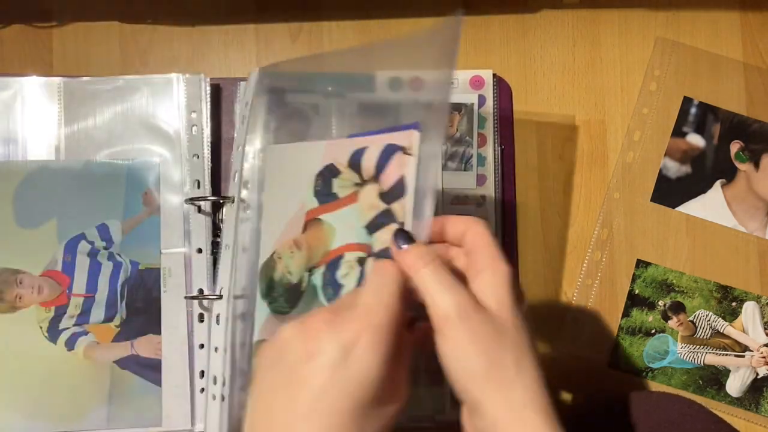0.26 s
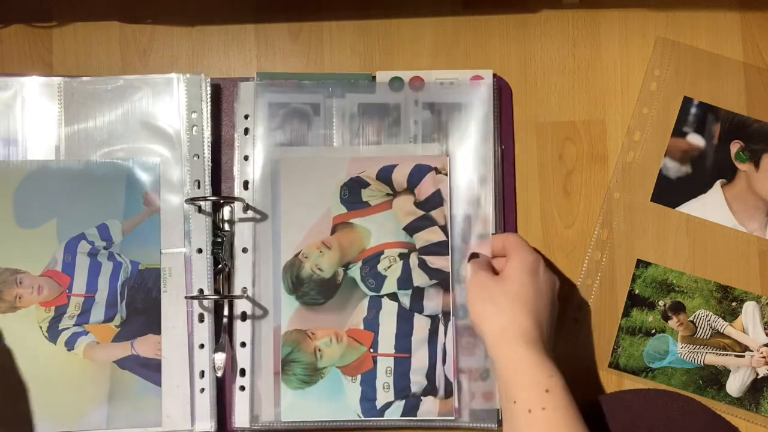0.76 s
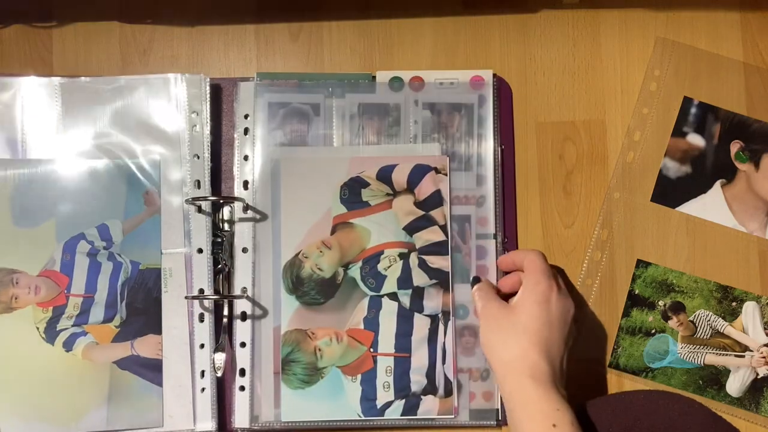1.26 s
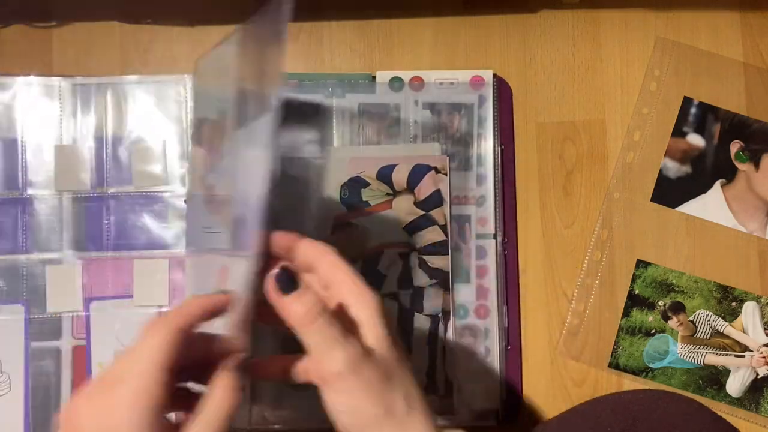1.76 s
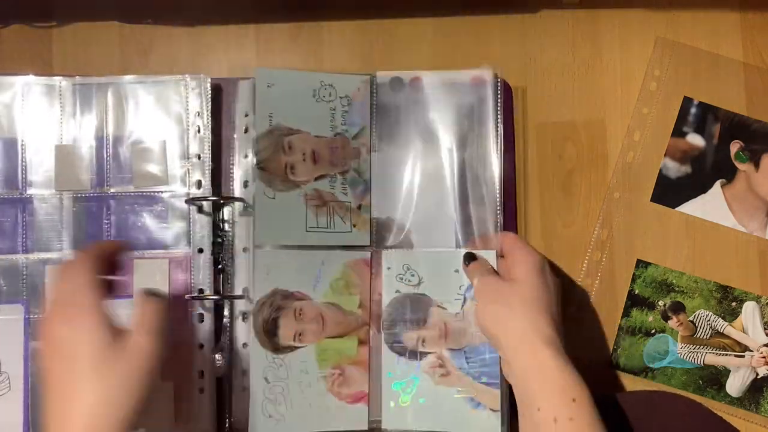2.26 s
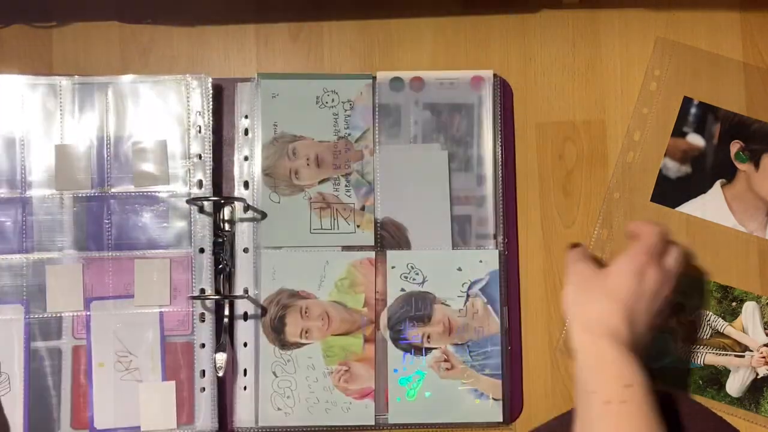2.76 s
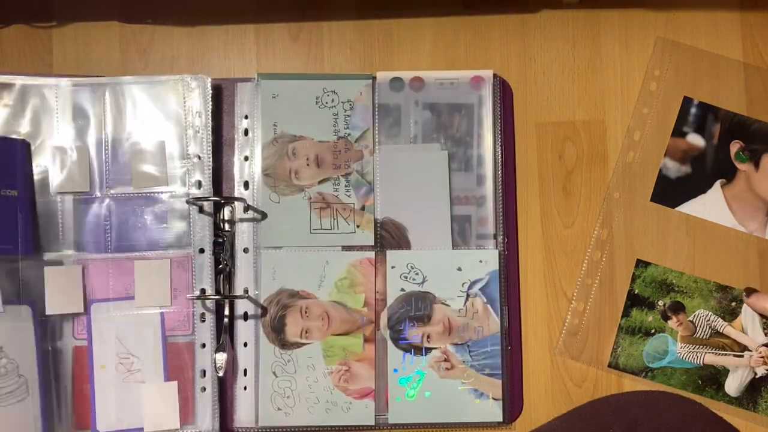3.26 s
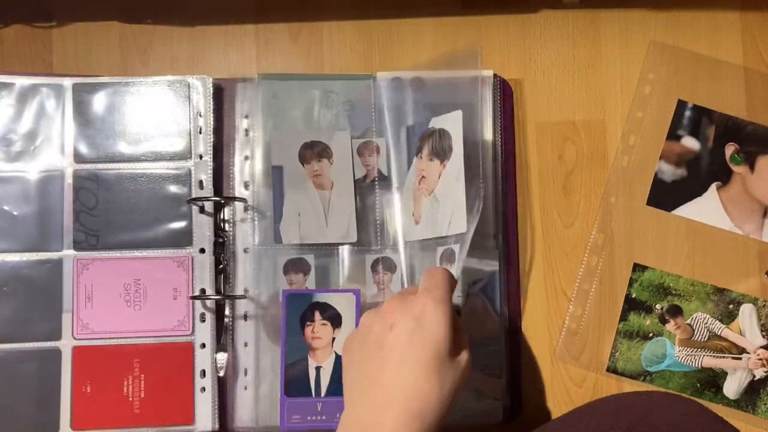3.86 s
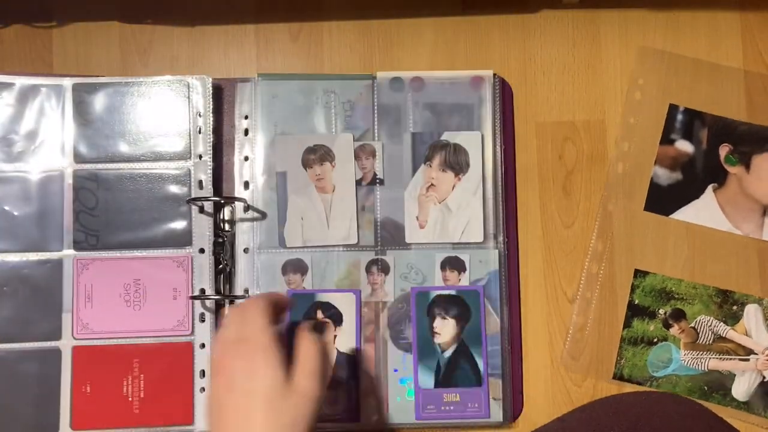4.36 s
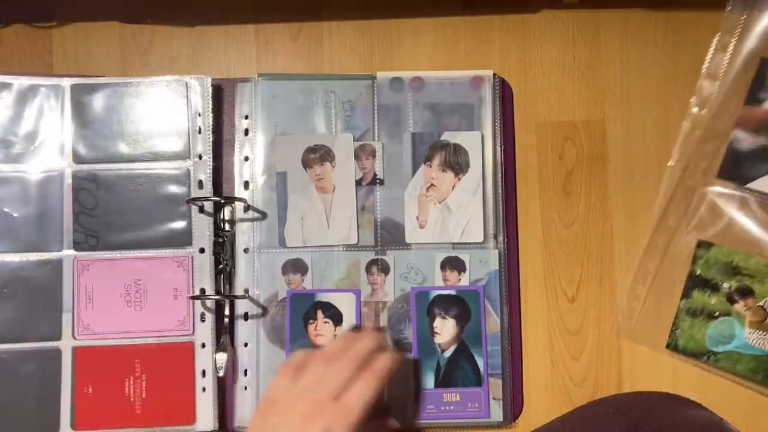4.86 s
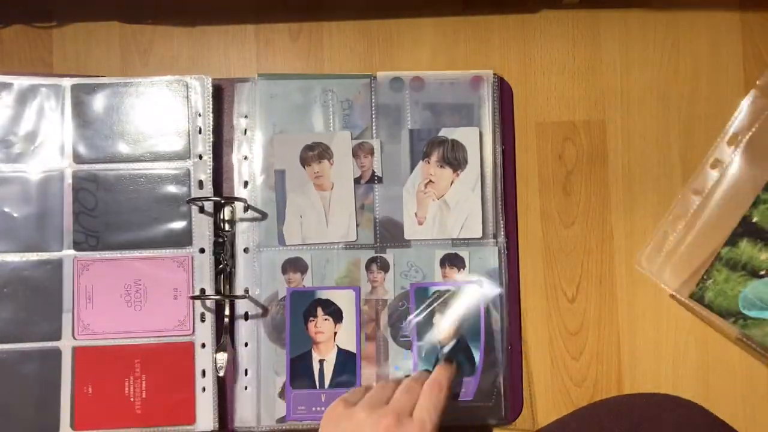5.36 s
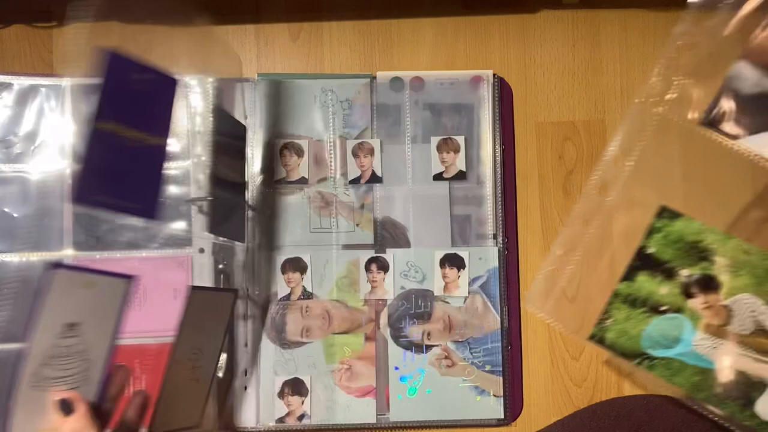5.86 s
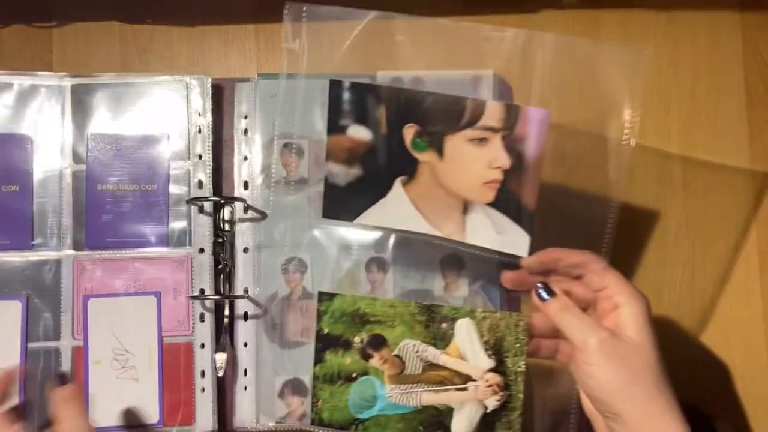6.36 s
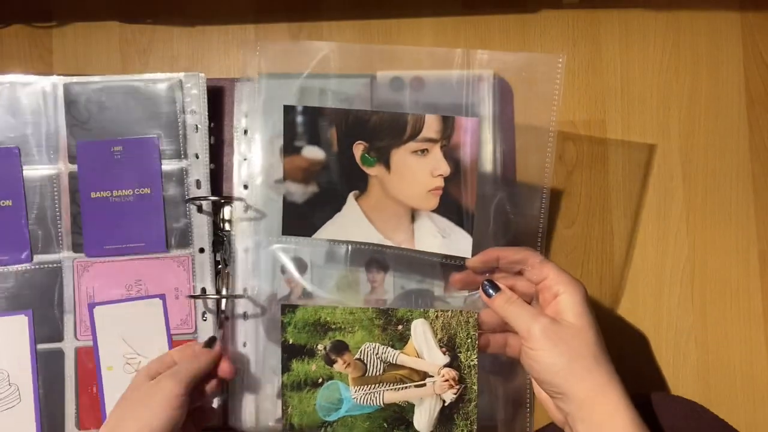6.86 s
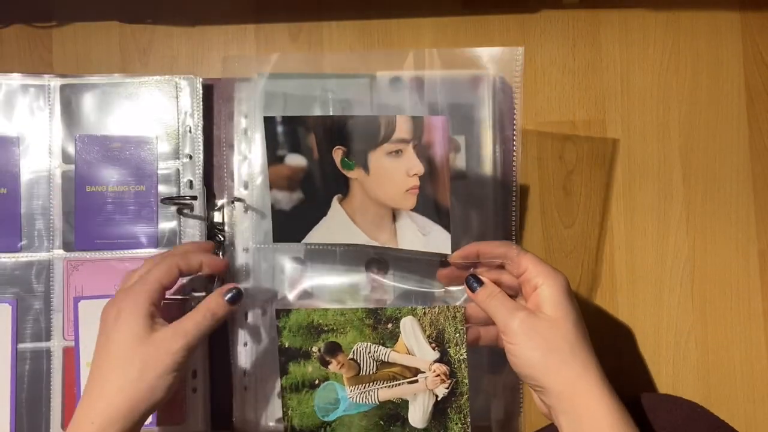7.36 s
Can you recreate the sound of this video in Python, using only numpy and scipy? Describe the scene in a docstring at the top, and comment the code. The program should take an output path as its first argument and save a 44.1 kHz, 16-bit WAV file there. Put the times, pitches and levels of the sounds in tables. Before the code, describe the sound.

Thin plastic pages crinkle, pop and swish under handling, a loose sleeve is shaken noisily, then metal binder rings snap open.

```python
"""Hands turn clear plastic sleeves in a ring binder on a desk: showers of tiny random slips excite resonant film.
Folds buckle with a crack and a falling pop, a loose sleeve is shaken flat, and pages push puffs of low noise.
Edges scrape as trains of short rings, a fingertip squeaks by stick-slip, and a stiff seam ticks.
The binder rings spring open with a clack of damped modes. A two-port microphone hears it all in a small room."""
import sys
import numpy as np
from scipy import signal
from scipy.fft import rfft, irfft
from scipy.io import wavfile
from scipy.ndimage import uniform_filter1d, map_coordinates

SR = 44100
rng = np.random.default_rng(int(sys.argv[2]) if len(sys.argv) > 2 else 0)


def wav_record(signal):
    """Record a signal, one row per channel, as 16-bit PCM in the file named by sys.argv[1]."""
    frames = np.transpose(np.atleast_2d(signal))
    bounded = np.clip(frames, -1, 1)
    # unit amplitude maps onto the largest positive 16-bit level
    quanta = np.round(bounded * 32767).astype(np.int16)
    wavfile.write(sys.argv[1], SR, quanta)


N = 336483

# broad resonances of the plastic film: f/Hz, width/Hz, gain/dB
FILM_MODES = [(3150, 1460, 9), (4460, 6700, -13.5), (5370, 2100, 7), (8710, 900, 10), (10750, 870, 10.5),
              (15600, 500, 3)]
# broad resonances of stiff creases and cards: f/Hz, width/Hz, gain/dB
CARD_MODES = [(1090, 210, 4), (1470, 660, 7), (2000, 1120, 5)]
# broad resonances of whole pages: f/Hz, width/Hz, gain/dB
PAGE_MODES = [(307, 193, -0.5), (494, 310, 1), (640, 240, 0.5)]


def undb(db):
    """Level to amplitude: 20 dB is a factor of ten."""
    return 10 ** (np.asarray(db) / 20)


def unit(x):
    """Normalisation to an rms of 1."""
    return x / np.sqrt(np.mean(x ** 2))


def resonate(x, modes):
    """Modal superposition: parallel broad resonances, neighbours in opposite phase."""
    out = 0
    for k, (hz, width, db) in enumerate(modes):
        b, a = signal.iirpeak(hz, hz / width, fs=SR)
        out = out + (-1) ** k * undb(db) * signal.lfilter(b, a, x)
    return out


def walk(rate):
    """Slow random modulation: normal values held for 1 / rate seconds, then smoothed by a moving average."""
    hold = int(SR / rate)
    steps = np.repeat(rng.standard_normal(N // hold + 1), hold)
    return uniform_filter1d(steps, hold)[:N]


def add(out, s, x):
    """Linear superposition: mix x into out from s seconds on."""
    i = int(s * SR)
    out[i:i + len(x)] += x[:len(out) - i]


def crinkle(modes, rate, spread_db, grain_s, smooth_db, patchy_db, colour_db=4.0, drift_db=1.0):
    """Shot noise: random slips (rate per second) over smooth rubbing excite each mode in varying strength."""
    at = np.flatnonzero(rng.random(N) < rate / SR)
    size_db = np.minimum(spread_db * rng.exponential(size=len(at)), 11)
    noise = undb(patchy_db * walk(25)) * rng.standard_normal(N)
    out = 0
    for k, mode in enumerate(modes):
        slips = np.zeros(N)
        slips[at] = undb(size_db + colour_db * rng.standard_normal(len(at)))
        grains = signal.lfilter([1], [1, -np.exp(-1 / (grain_s * SR))], slips)
        rubbing = undb(smooth_db + drift_db * walk(13.0))
        out = out + (-1) ** k * resonate((unit(grains) + rubbing) * noise, [mode])
    return unit(out)


def tilted(level_db, tilt_db, film_db, page_db):
    """Spectral tilt: gains of film, card and page, where a heavier bend trades film for page."""
    return undb([level_db - tilt_db + film_db, level_db, level_db + tilt_db + page_db])


def rustle():
    """Friction noise: film, cards and pages follow the hands; moving pages displace air as low-frequency noise."""
    # rubbing of the hands: t/s, level/dB, tilt towards the bass/dB
    hand_rubs = [(0.0, -62, -9), (.25, -81, 14.5), (.53, -67, -5.5), (1.04, -89, -3), (1.4, -75.5, -6.5),
                 (1.7, -63, -2.5), (2.17, -64, 1), (2.68, -81.5, -5), (3.08, -84, -5), (3.51, -54, -5),
                 (3.65, -63, 3.5), (3.91, -61, 3.5), (4.1, -92, -24), (4.4, -60, 1), (4.93, -71, -14.5),
                 (5.151, -66.5, 6.5), (5.5, -72.5, 3), (6.1, -55, -1), (6.271, -74.5, 2), (6.821, -73, 8.5),
                 (7.63, -86.5, 14)]
    # puffs of air pushed by the pages: peak t/s, level/dB
    air_puffs = [(0.01, -53), (.17, -55), (.33, -53), (.76, -56), (1.64, -52), (1.8, -60), (2.32, -58.5),
                 (3.15, -63.5), (3.48, -52), (3.618, -59), (4.049, -53), (5.08, -46), (5.254, -40),
                 (5.65, -51), (5.829, -47), (6.86, -55)]
    # resonances of the moving air: f/Hz, width/Hz, gain/dB
    air_modes = [(66, 35.5, 3.5), (123, 63, 1.5), (186, 99, -2)]
    film_db, page_db, air_db = -0.5, -1.5, -12  # against the rubbing level
    air_rest_db = -77
    rise_db_per_s, fall_db_per_s = 499.5, 305.5  # slopes of a puff
    t = np.arange(N) / SR
    s, *columns = np.transpose(hand_rubs)
    level_db, tilt_db = (np.interp(t, s, c) for c in columns)
    film = crinkle(FILM_MODES, 120., 4.2, 0.00081, -0.8, 1.7)
    card = crinkle(CARD_MODES, 51.0, 4.4, 0.0073, 0.86, 1.1)
    page = crinkle(PAGE_MODES, 58.0, 2.5, 0.015, 0.67, 6.0)
    air = undb(5.6 * walk(12)) * resonate(rng.standard_normal(N), air_modes)
    fan = undb(level_db + air_db) + undb(air_rest_db)
    for peak, db in air_puffs:
        drop_db = np.maximum(rise_db_per_s * (peak - t), fall_db_per_s * (t - peak))
        fan = fan + undb(db - drop_db)
    rub = np.sum(tilted(level_db, tilt_db, film_db, page_db) * [film, card, page], axis=0)
    return rub + fan * unit(air)


def hush():
    """Stationary random noise: room tone of fixed spectrum, coherent between the ports in the bass."""
    # corners of the room-tone spectrum: f/Hz, relative level/dB
    tone_spectrum = [(30, 30), (68, 11), (1580, -43.5), (2480, -8), (5450, -10), (7260, -49.5),
                     (9000, -0.5), (11700, -68.5), (19800, -120)]
    level_db = -78
    f = np.maximum(np.arange(N // 2 + 1) * SR / N, 1)
    hz, db = np.transpose(tone_spectrum)
    shape = undb(np.interp(np.log(f), np.log(hz), db))
    mid, side = rfft(rng.standard_normal((2, N))) * shape
    side = side * np.minimum(f / 500, 1)
    return undb(level_db) * unit(irfft(np.array([mid + side, mid - side]), N))


def crumples():
    """Shot noise under an envelope: each handful of film swells exponentially to a peak and fades again."""
    # crumpled handfuls: peak t/s, level/dB, tilt towards the bass/dB, extra for stiff creases/dB,
    # build-up/s and fade/s (each to exp(-2) of the peak amplitude)
    handfuls = [(0.102, -60.5, 0, 0.5, 0.019, 0.031), (0.1634, -52, 2.5, -7, 0.021, 0.025),
                (0.2304, -48.5, -2.5, -0.5, 0.015, 0.025), (0.289, -49.5, 2, -6.5, 0.013, 0.078),
                (0.566, -53.5, 4, -4.5, 0.016, 0.031), (0.775, -70, 27, -6, 0.013, 0.044),
                (0.927, -63, -1, -16, 0.047, 0.02), (1.072, -64.5, -9.5, 5.5, 0.041, 0.059),
                (1.347, -59.5, 1.5, 3, 0.084, 0.043), (1.454, -60.5, -1.5, 5.5, 0.014, 0.044),
                (1.611, -52, -2.5, -1, 0.08, 0.16), (1.799, -47, 4, -6.5, 0.005, 0.026),
                (1.975, -47, -3, 0, 0.054, 0.012), (2.631, -65, -6.5, 1, 0.051, 0.0087),
                (3.001, -71.5, -11.5, 2, 0.0034, 0.15), (3.154, -59, -2, 2, 0.023, 0.11),
                (3.389, -54, -4.5, 1, 0.041, 0.049), (3.9385, -53, -1.5, -2.5, 0.085, 0.16),
                (4.318, -54, -1.5, -9, 0.12, 0.056), (4.3685, -55.5, -0.5, 6, 0.026, 0.014),
                (4.461, -55.5, 0, 8.5, 0.0064, 0.015), (4.65, -50, -3, 3, 0.021, 0.015),
                (4.893, -45, -3.5, -1.5, 0.0082, 0.0087), (4.917, -46, -2.5, -2.5, 0.0078, 0.034),
                (5.079, -32, -3.5, -1, 0.02, 0.018), (5.139, -28.5, -7.5, -0.5, 0.0065, 0.012),
                (5.228, -38.5, -3, -3.5, 0.024, 0.06), (5.41, -58.5, 1, 2, 0.036, 0.063),
                (5.667, -66.5, -14.5, -6, 0.063, 0.0046), (5.9523, -46, 0, 0, 0.042, 0.011),
                (6.001, -53, 1.5, 4.5, 0.022, 0.097), (6.167, -49, -0.5, -8.5, 0.028, 0.072),
                (6.806, -64.5, -4, 2, 0.0074, 0.25), (7, -64.5, 7.5, -10.5, 0.16, 0.031),
                (7.311, -67.5, 11, 5.5, 0.079, 0.037), (7.444, -60.5, -1, 2, 0.024, 0.019)]
    crackle_db, flutter_db = 1.3, -1.5  # against the crumple level
    t = np.arange(N) / SR
    shape = np.zeros((3, N))
    for s, level_db, tilt_db, crease_db, build, fade in handfuls:
        near = slice(max(int((s - .15) * SR), 0), int((s + 0.28) * SR))
        x = t[near] - s
        swell = np.exp(-2 * np.where(x < 0, -x / build, x / fade))
        gains = tilted(level_db, tilt_db, crackle_db, flutter_db) * undb([0, crease_db, 0])
        shape[:, near] += gains[:, None] * swell
    crackle = crinkle(FILM_MODES, 300., 5.9, 0.0086, -26.5, 0.71)
    crease = crinkle(CARD_MODES, 400., 2.5, 0.0032, -4.1, .8, 3.5)
    flutter = crinkle(PAGE_MODES, 150., 5.6, 0.0022, -1.5, 0.57, 1.2)
    crease = unit(resonate(crease, [(1650, 2300, 0)]))
    return np.sum(shape * [crackle, crease, flutter], axis=0)


def folds():
    """Snap-through buckling and dispersion: a creak, a crack, a rattle, and a bending wave, high part first."""
    # buckling folds: t/s, crack drive/dB, crease drive/dB, crease f/Hz, pop drive/dB, final pop f/Hz
    buckles = [(0.147, -43, -48, 1080, -61, 464), (0.372, -37, -40, 2550, -57.5, 280),
               (0.7563, -52, -49, 1130, -39, 398), (0.9056, -42, -43, 1870, -47, 387),
               (0.918, -30.5, -34.5, 1600, -41.5, 392), (0.927, -30.5, -32.5, 1820, -46.5, 434),
               (1.078, -33, -38.5, 1620, -46.5, 446), (1.1963, -32.5, -37.5, 1400, -55.5, 380),
               (1.5534, -24, -39.5, 1130, -57, 646), (1.573, -29, -41.5, 1080, -44.5, 189),
               (2.0645, -33, -34.5, 1020, -38.5, 320), (2.182, -39, -42.5, 2050, -47.5, 690),
               (2.2778, -40.5, -39, 1170, -47, 790), (2.2938, -37, -37.5, 1160, -50, 129),
               (2.4307, -46, -60, 895, -41.5, 466), (2.823, -54, -86, 2060, -83, 213),
               (2.9156, -35, -36, 1730, -45, 345), (3.024, -60, -55, 1520, -81, 400),
               (3.0473, -44, -48.5, 1520, -64, 186), (3.081, -65, -48.5, 1460, -54, 336),
               (3.199, -60, -50, 1400, -69, 610), (3.209, -63, -43, 1870, -72, 394),
               (3.3152, -39.5, -58, 1730, -65, 183), (3.33, -62, -44, 1700, -71, 200),
               (3.4214, -57, -51, 1940, -44, 610), (3.4309, -28.5, -45, 2050, -43.5, 200),
               (3.592, -25, -29, 945, -35.5, 290), (3.604, -58, -32.5, 1780, -47, 275),
               (3.6504, -32.5, -39.5, 1790, -46, 706), (3.663, -55, -46, 1820, -43, 350),
               (3.7164, -60, -40, 1590, -41, 653), (3.756, -32.5, -67, 2090, -57, 270),
               (3.836, -40, -47.5, 2080, -52, 650), (4.027, -28, -35, 1530, -45, 524),
               (4.072, -25.5, -43, 2040, -73, 211), (4.354, -63, -37.5, 1920, -60, 495),
               (4.429, -81, -37.5, 1130, -69, 493), (4.526, -67, -31, 1130, -46, 526),
               (5.005, -27, -48, 2100, -44.5, 630), (5.0559, -19.5, -36.5, 1002, -43.5, 607),
               (5.0682, -19.5, -29, 992, -61.5, 624), (5.076, -25.5, -54, 926, -46, 614),
               (5.1214, -53.5, -32.5, 1660, -47, 130), (5.1318, -12.5, -26.5, 2200, -33.5, 655),
               (5.213, -26, -41, 2380, -49, 167), (5.2307, -12.5, -27, 2380, -23.5, 295),
               (5.399, -52, -38.5, 1640, -44, 537), (5.618, -57, -45, 1630, -57, 410),
               (5.71, -69, -45.5, 1190, -58, 766), (5.768, -69, -55, 1190, -48, 566),
               (5.8123, -24.5, -27, 1620, -34.5, 162), (5.921, -66, -66, 990, -35, 500),
               (6.0286, -63, -36.5, 940, -55, 836), (6.243, -37.5, -47, 1700, -67, 335),
               (6.2509, -83, -44, 1750, -43, 301), (6.4222, -43.5, -55, 1120, -55.5, 290),
               (6.495, -81.5, -53, 910, -49.5, 260), (6.5941, -41.5, -42, 975, -53, 343),
               (7.043, -45.5, -55.5, 2020, -54.5, 363), (7.334, -78, -50, 877, -50.5, 356),
               (7.3673, -89, -45.5, 900, -56, 356.6), (7.394, -78, -50, 1000, -52.5, 338),
               (7.443, -65, -47, 2480, -52.5, 805)]
    rattle_s, creak_s = 0.0093, .004  # time constants
    lead = 4 * creak_s
    t = np.arange(int(.15 * SR)) / SR - lead
    after = np.maximum(t, 0)
    fade = np.exp(-after / rattle_s)
    creak = 0.11 * np.exp(np.minimum(t, 0) / creak_s) * (t < 0)
    snap = (np.exp(-after / 0.0012) + 0.29 * fade) * np.minimum(after / 0.0012, 1) + creak
    click_shape = np.exp(-after / 0.001) * np.minimum(after / 0.0004, 1)
    crack, body = np.zeros((2, N))
    noise = rng.standard_normal((len(buckles), 3, len(t)))
    for (s, crack_db, crease_db, crease_hz, pop_db, pop_hz), n in zip(buckles, noise):
        add(crack, s - lead, undb(crack_db) * snap * n[0])
        click = click_shape * np.sin(2 * np.pi * crease_hz * after)
        broad = resonate(snap * n[1], [(crease_hz, 1.29 * crease_hz, 0)])
        rasp = resonate(broad, [(crease_hz, 0.73 * crease_hz, 10.0)])
        # the pop starts at 1.5 times its final pitch and glides down
        turns = pop_hz * (after + 0.002 * (1 - np.exp(-after / 0.004)))
        swing = (1 - np.exp(-turns / 2.4)) * np.exp(-turns / 2.38)
        flutter = unit(resonate(n[2], [(pop_hz, 0.6 * pop_hz, 0)]))
        flutter = flutter * fade * (1 - np.exp(-after / 0.0017))
        pop = 2.57 * swing * np.sin(2 * np.pi * turns) + 0.99 * flutter
        add(body, s - lead, undb(crease_db) * (2.15 * click + rasp) + undb(pop_db) * pop)
    return 0.38 * resonate(crack, FILM_MODES) + body


def scrapes():
    """Stick-slip on an edge: uneven slips a few cycles apart, each a short ring; the pitch drifts along the drag."""
    # film dragged over an edge: t/s, length/s, starting f/Hz, final f/Hz, mean drive/dB
    drags = [(0.878, 0.076, 1713, 2250, -50), (2.46, 0.072, 569, 485, -48.5),
             (2.988, 0.043, 4490, 4600, -57.5), (3.165, 0.026, 219, 190, -51),
             (3.211, 0.051, 2050, 1790, -58.5), (6.117, 0.027, 1645, 1600, -40.5),
             (6.151, 0.041, 1498, 1710, -43.5), (6.218, 0.01, 1750, 1800, -44)]
    slip_cycles, ring_cycles = 4, 1.1  # between slips; from a ring's start to its peak
    out = np.zeros(N)
    t = np.arange(int(.03 * SR)) / SR
    for s, length, start_hz, end_hz, db in drags:
        late, bend, size = rng.standard_normal((60, 3)).T
        x = (np.arange(len(late)) + 1 + 0.41 * late) * slip_cycles / start_hz / length
        pitches = np.interp(x, [0, 1], [start_hz, end_hz]) * (1 + 0.17 * bend)
        for at, hz, gain in zip(x, pitches, undb(db + 4.0 * size)):
            if 0 < at < 1:
                c = hz * t / ring_cycles
                ring = np.e * c * np.exp(-c) * np.sin(2 * np.pi * hz * t)
                add(out, s + at * length, gain * np.sqrt(np.sin(np.pi * at)) * ring)
    return out


def squeaks():
    """Stick-slip oscillation: a short, uneven harmonic tone that climbs as the fingertip speeds up."""
    # fingertip slipping on film: t/s, length/s, starting f/Hz, drive/dB
    finger_slips = [(3.147, 0.0204, 1047, -49.5), (6.725, 0.018, 550.8, -59)]
    rise = 0.54  # share of the starting pitch
    overtones_db = (-5.5, -20.5)  # 2nd and 3rd harmonic
    out = np.zeros(N)
    wobble = undb(4.4 * walk(150))
    for s, length, hz, db in finger_slips:
        x = np.arange(int(length * SR)) / SR / length
        phase = 2 * np.pi * hz * length * (x + rise * x ** 2 / 2)
        tone = np.sin(phase)
        for k, overtone_db in enumerate(overtones_db):
            tone = tone + undb(overtone_db) * np.sin((k + 2) * phase)
        add(out, s, undb(db) * np.sin(np.pi * x) * tone)
    return out * wobble


def seam():
    """Impulse response: a stiff seam bends in small, nearly even jerks, each a damped sinusoidal tick."""
    start_s, jerks_per_s, tick_hz, mean_db = 4.259, 61., 2350, -49
    t = np.arange(int(.02 * SR)) / SR
    tick = np.sin(2 * np.pi * tick_hz * t) * np.exp(-t / .0015)
    out = np.zeros(N)
    for k, (late, db) in enumerate(rng.standard_normal((7, 2))):
        add(out, start_s + (k + 0.044 * late) / jerks_per_s, undb(mean_db + 2.0 * db) * tick)
    return out


def rings():
    """Impact excitation of damped modes: sprung rings scrape free, strike their stop and rebound."""
    # modes of binder spine and rings: f/Hz, relative level/dB, t60/s
    spine_modes = [(348, -24, 0.26), (672, 4.5, 0.037), (980, 8.5, 0.019), (1140, 9, 0.014),
                   (1510, -7, 0.047), (2270, 10.5, 0.0048)]
    # broad resonances of the steel: f/Hz, width/Hz, gain/dB
    steel_modes = [(1800, 810, 4), (3360, 730, 4), (4200, 820, 4.5), (7140, 3200, -3.5), (11300, 1400, -2)]
    clack_s, clack_db = 6.8434, -16.5
    t = np.arange(int(.3 * SR)) / SR
    knock = 0
    for hz, db, t60 in spine_modes:
        knock = knock + undb(db) * np.sin(2 * np.pi * hz * t) * np.exp(-np.log(1000) * t / t60)
    knock *= np.minimum(t / 0.0018, 1)
    x = t - .011
    scrape = 1.8 * np.exp(x / 0.002) + 0.022 * np.exp(x / 0.0049)
    strike = 1.2 * np.exp(-x / 0.00078) + 0.15 * np.exp(-x / 0.026)
    burst = np.where(x < 0, scrape, strike)
    out = np.zeros(N)
    add(out, clack_s - .01, undb(clack_db) * resonate(rng.standard_normal(len(t)) * burst, steel_modes))
    add(out, clack_s, undb(clack_db) * knock)
    add(out, clack_s + .0037, undb(clack_db - 10.0) * knock)  # rebound
    return out


def room(x):
    """Diffuse reverberation: convolution with decaying noise, thin in the bass, shared by the ports only there."""
    t60_s, treble_t60_s, level_db = 0.18, 0.19, -8
    x = signal.lfilter(*signal.butter(1, 450, "high", fs=SR), x)
    t = np.arange(int(.5 * SR)) / SR
    n = rng.standard_normal((3, len(t)))
    low = signal.lfilter(*signal.butter(1, 1500, fs=SR), n)
    n = low * 10 ** (-3 * t / t60_s) + 0.52 * (n - low) * 10 ** (-3 * t / treble_t60_s)
    shared = signal.lfilter(*signal.butter(1, 150, fs=SR), n)
    tail = (shared[0] + (n - shared)[1:]) * np.minimum(t / 0.0019, 1)
    tail = tail / np.sqrt(np.sum(tail[0] ** 2))
    return undb(level_db) * signal.fftconvolve(x[None], tail, axes=1)[:, :N]


def ports(x, lag_ms, pan_db):
    """Interaural-style cues: delay and level differ between left and right port, split evenly about the middle."""
    i = np.arange(N)
    half = lag_ms * SR / 2000  # half the lag in samples
    return np.array([undb(side * pan_db / 2) * map_coordinates(x, [i - side * half], order=3)
                     for side in (1, -1)])


def scene():
    """Superposition and diffraction: all sources reach the two ports band by band, with room and room tone."""
    # where the hands work: t/s, lag of the left port/ms, left minus right/dB
    hand_places = [(0, -0.13, -1.5), (1.9, -0.11, -0.5), (2.4, -0.12, -1), (3.9, -0.1, -2.5),
                   (4.102, 0.39, -5), (5.3, 0.26, -5), (5.4, -0.11, -4), (6.1, -0.081, 0),
                   (6.499, -0.096, -1.5)]
    dry = rustle() + crumples() + folds() + scrapes() + squeaks() + seam() + rings()
    s, lag_ms, pan_db = np.transpose(hand_places)
    t = np.arange(N) / SR
    # the housing steers deep and shrill sounds alike from every place; the middle follows the hands; # the
    # treble keeps its own fixed lag and pan and enters with its sign flipped
    bass = signal.sosfiltfilt(signal.butter(2, 200, fs=SR, output="sos"), dry)
    treble = signal.sosfiltfilt(signal.butter(8, 3300, "high", fs=SR, output="sos"), dry)
    middle = ports(dry - bass - treble, np.interp(t, s, lag_ms), np.interp(t, s, pan_db))
    direct = ports(bass, .55, 1.6) + middle - ports(treble, -.25, -1.4)
    return direct + room(dry) + hush()


def record(dry):
    """Band limiting: the microphone drops the deep bass and the top."""
    x = signal.sosfilt(signal.butter(4, 42, "high", fs=SR, output="sos"), dry)
    return signal.sosfilt(signal.ellip(8, .2, 70, 16100, fs=SR, output="sos"), x)


dry = scene()
out = record(dry)
wav_record(out)
```